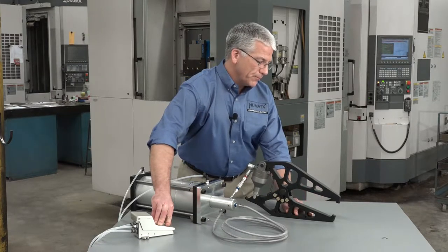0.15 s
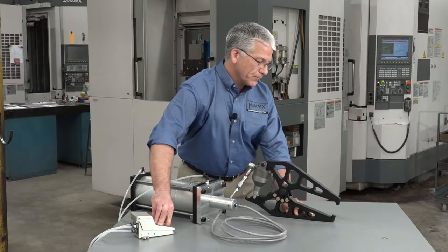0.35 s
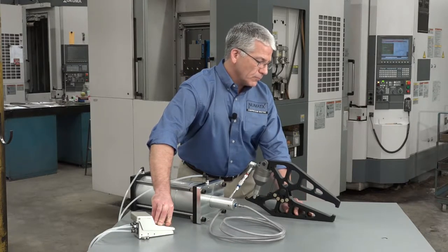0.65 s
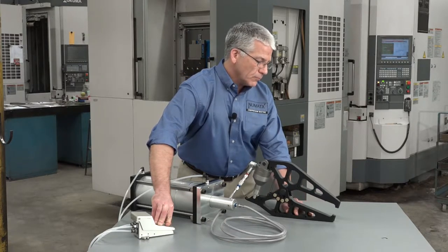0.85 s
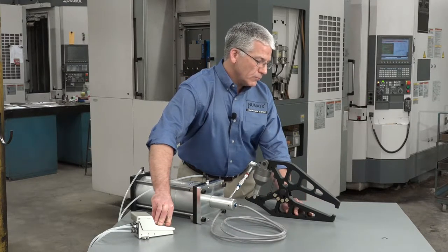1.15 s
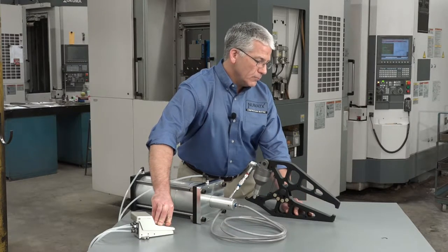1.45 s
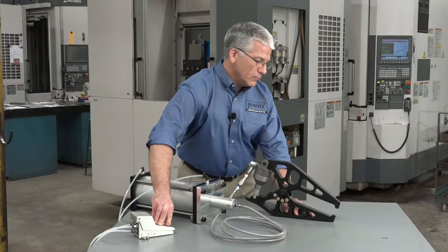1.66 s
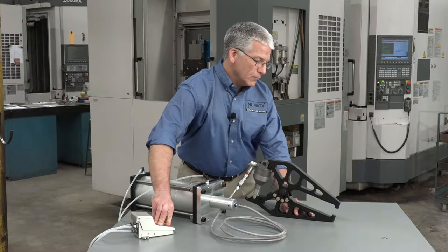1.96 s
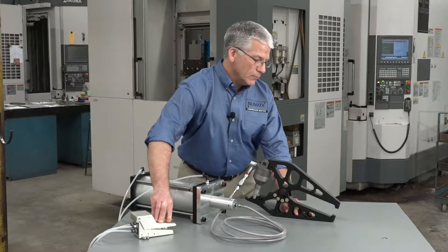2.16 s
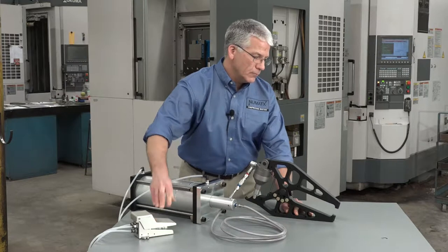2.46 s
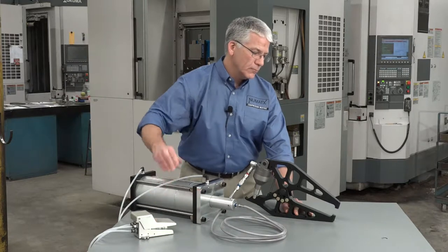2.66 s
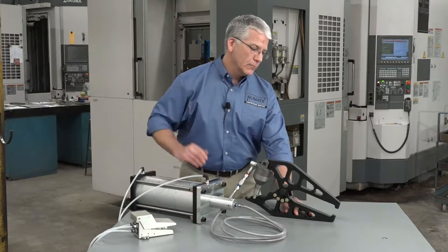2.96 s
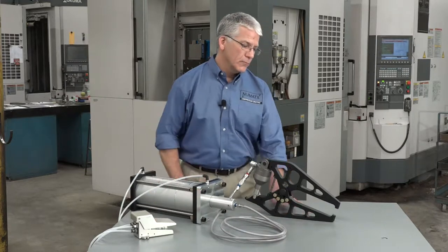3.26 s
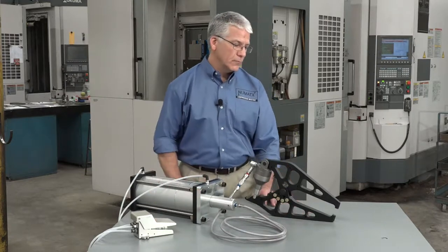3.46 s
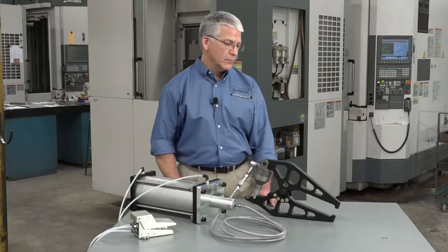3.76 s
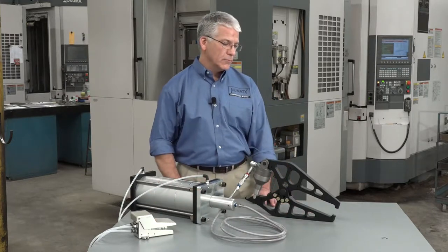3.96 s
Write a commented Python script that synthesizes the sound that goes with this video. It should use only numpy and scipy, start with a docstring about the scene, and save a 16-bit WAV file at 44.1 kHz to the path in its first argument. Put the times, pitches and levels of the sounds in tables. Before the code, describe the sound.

A loud rush of pressurised air ends in a hard knock; thin whistly hissing follows, then a bright burst of exhaust air slowly dies away.

```python
"""In a workshop, on a chest microphone: compressed air rushes through a pedal valve into a steel cylinder,
as shaped noise, until the piston knocks at its stop, a sum of dying body tones. The last air seeps in
and the cylinder whistles in many narrow bands of resonated noise. The pedal is let go and the cylinder
vents, as noise that fades and changes colour; a short bright rush joins as the venting opens, along with
a chirp of the valve. A faint bed of shop noise runs throughout."""
import sys
import numpy as np
from scipy import signal
from scipy.fft import rfft, irfft, next_fast_len
from scipy.io import wavfile
from scipy.ndimage import uniform_filter1d

SR = 44100
rng = np.random.default_rng(int(sys.argv[2]) if len(sys.argv) > 2 else 0)


def transcribe(signal):
    """Save signal, clipped to [-1, 1], as a 16-bit WAV file at the path in sys.argv[1]."""
    frames = np.atleast_2d(signal).T
    limited = np.clip(frames, -1, 1)
    pcm = np.round(limited * 32767).astype(np.int16)
    wavfile.write(sys.argv[1], SR, pcm)


N = 181115
T = np.arange(N) / SR
HZ = np.fft.rfftfreq(next_fast_len(N), 1 / SR)
KNOCK_S, WHISTLE_S = 0.7238, 2.289  # the piston meets its stop; the valve whistles as it cracks open

# faint top of the filling and venting jets: pitch_hz, width_hz (at half amplitude), level_db (relative)
AIRY_TOP = [(11500, 3000, -49), (13200, 1500, -56)]


def gain_of(db):
    """Amplitude factor for a level in dB."""
    return 10 ** (np.asarray(db) / 20)


def evened(x):
    """Scales to rms 1."""
    return x / np.sqrt(np.mean(x ** 2) + 1e-20)


def read(points, hz):
    """Reads a curve of (Hz, value) points on a logarithmic pitch axis."""
    point_hz, value = np.transpose(points)
    return np.interp(np.log(hz + 1), np.log(point_hz + 1), value)


def coloured(x, gain):
    """Filters by a gain for each frequency in HZ."""
    size = next_fast_len(N)
    return irfft(rfft(x, size) * gain, size)[:N]


def wander(top_hz):
    """Random drift, rms 1, from 24 sines spaced 1 Hz to top_hz, the slowest strongest."""
    t = np.arange(0, N / SR + 0.01, 1 / 200)  # 200 points a second: sines above 100 Hz fold down
    phases = 2 * np.pi * rng.random(24)
    rates_hz = np.geomspace(1, top_hz, len(phases))
    swings = np.sin(2 * np.pi * t[:, None] * rates_hz + phases)
    return np.interp(T, t, evened(swings @ rates_hz ** -0.5))


def resonate(x, hz, pole_width_hz):
    """A gliding resonance: shifts the curve hz down to zero, smooths twice, and shifts back."""
    turn = np.exp(2j * np.pi * np.cumsum(hz) / SR)
    r = np.exp(-np.pi * pole_width_hz / SR)
    smooth = signal.lfilter([(1 - r) ** 2], [1, -2 * r, r * r], x * turn.conj())
    return (turn * smooth).real


def jet(spectrum, passages=(), jet_db=0):
    """Turbulent noise, rms 1: a broad spectrum plus the resonances of the air passages."""
    power = gain_of(read(spectrum, HZ) + jet_db) ** 2
    for hz, width_hz, db in passages:
        power = power + (gain_of(db) / (1 + (2 * (HZ - hz) / width_hz) ** 2)) ** 2
    return evened(coloured(rng.standard_normal(N), np.sqrt(power)))


def patchy(x, db):
    """Random patches of pitch and time make the colour uneven."""
    z = signal.stft(x, nperseg=1024)[2]
    patches = uniform_filter1d(rng.standard_normal(z.shape), size=4, axis=0)  # over pitch
    patches = uniform_filter1d(patches, size=14, axis=1)  # over time
    return signal.istft(z * gain_of(db * evened(patches)), nperseg=1024)[1][:N]


def lopsided(x, skew):
    """Pressure dips run deeper than peaks rise: a share of the square adds rumble and a flickering treble."""
    # colour of the squared pressure: pitch_hz, level_db
    square_colour = [(30, -23), (110, 7), (2000, -4), (6000, 9), (9000, -23), (11500, -21), (14500, -33)]
    return x - skew * coloured(x ** 2, gain_of(read(square_colour, HZ)))


def shop():
    """The room's steady background, as shaped noise."""
    # background spectrum: pitch_hz, density_db (per Hz, relative)
    shop_spectrum = [(18, -67), (30, -34), (146, -5), (178, -13), (257, -6.5), (403, -14.5), (815, -15),
                     (881, -16), (1610, -16), (3200, -20.5), (4160, -25), (7040, -120)]
    return gain_of(-54.5) * jet(shop_spectrum)


def fill():
    """The open valve feeds the moving piston; at the stop the flow collapses and the shop rings on."""
    # jet spectrum: pitch_hz, density_db (per Hz, relative)
    fill_spectrum = [(18, -59), (30, -33), (89, -5.5), (135, 0), (199, -7.5), (524, -16), (937, -6.5),
                     (1350, -11.5), (1640, -8.5), (2140, -11.5), (3150, -1.5), (3550, -5), (5490, -5.5),
                     (6350, -17.5), (9830, -36), (12800, -60), (21600, -120)]
    # air passages: pitch_hz, width_hz (at half amplitude), level_db (relative)
    fill_passages = [(134, 54, -7), (970, 330, -14.5), (1585, 82, -5), (2224, 37, -12.5), (3160, 126, 3),
                     (3380, 27, -15), (4055, 120, -1.5), (4374, 80, 2), (4690, 110, 2), (5310, 110, 0.5),
                     (5370, 110, -6), (7380, 43, -23), (8400, 31, -14.5), (9910, 150, -56)]
    level_db, sag_db_per_s = -22.5, 4.5  # the level sags while the piston travels
    shut_s, shut_t60_s = 0.733, 0.2
    echo, echo_t60_s = gain_of(-10), 0.42  # share of the sound that rings on

    air = patchy(jet(fill_spectrum, fill_passages + AIRY_TOP, jet_db=0.5), db=1.0)
    air = air * gain_of(0.5 * wander(40))
    after = np.maximum(T - shut_s, 0)
    stop = (1 - echo) * gain_of(-60 * after / shut_t60_s) + echo * gain_of(-60 * after / echo_t60_s)
    sagging = gain_of(level_db - sag_db_per_s * np.minimum(T, shut_s))
    return sagging * stop * lopsided(air, skew=0.076)


def seep_level():
    """Gain of the seeping air: creeps in under the roar, opens after the knock, runs down in a line."""
    level_db, under_db, rise_s = -36.5, -3.5, 0.14  # under_db: extra level until the knock
    rundown_s, equal_s = 1.21, 2.54  # the line starts down; it would reach zero
    cut_s = 0.03  # the seeping dies as the valve turns over

    rise_db = under_db * (1 - np.clip((T - KNOCK_S) / rise_s, 0, 1))
    flow = np.clip((equal_s - T) / (equal_s - rundown_s), 0, 1)
    flow = flow * np.minimum(T / KNOCK_S, 1)
    cut = np.clip(1 - (T - WHISTLE_S) / cut_s, 0, 1)
    return gain_of(level_db + rise_db) * flow * cut


def seep():
    """Faint turbulence excites narrow modes of the trapped air, which rise a little as pressure settles."""
    # jet spectrum: pitch_hz, density_db (per Hz, relative)
    seep_spectrum = [(1000, -27), (3200, -20.5), (3800, -9), (5500, -6), (6300, -16), (8000, -23),
                     (9200, -37.5), (14000, -51)]
    # modes of the trapped air once the pressure has settled: pitch_hz
    mode_pitches = [1600, 2310, 2700, 3685, 3800, 4285, 4560, 4815, 4900, 5160, 5495, 5720, 5875, 6065,
                    6360, 6595, 6960, 7125, 7520, 7920, 8230, 8700, 9860]
    # the same modes: nominal width_hz, level_db at 1.25 s (for a width of 300 Hz), change_db_per_s
    mode_shapes = [(40, -18.5, 4), (35, -20.5, 6), (32, -20, 4), (56.4, -5, -2), (110, -16.5, 10.5),
                   (40, -6.5, 2.5), (100, -15.5, 5), (67.7, 0, -2), (70, -6, 1.5), (45, -3, 2.5),
                   (88.4, -4, -1), (90, -12, -15), (89, -0.5, -10), (40, -10, -17), (80, -23, -6),
                   (69.6, -17, -16), (50, -15.5, -9), (60, -16, -14), (150, -22.5, -22), (130, -20, -12),
                   (70, -34, -3), (150, -34.5, -23), (50, -38, -13)]

    end = round((WHISTLE_S + 0.1) * SR)
    tuning = 1 - 0.022 * np.exp(-np.maximum(T - 0.75, 0) / 0.33)
    air = gain_of(-12) * jet(seep_spectrum)
    for hz, (width_hz, db, slope_db) in zip(mode_pitches, mode_shapes):
        drift = tuning * (1 + 0.0008 * wander(6))
        mode = evened(resonate(rng.standard_normal(end), hz * drift[:end], 1.19 * width_hz))
        swell_db = db + slope_db * (T - 1.25) + 0.39 * wander(7.5)
        air[:end] += mode * np.sqrt(width_hz / 300) * gain_of(swell_db[:end])
    return seep_level() * lopsided(air * gain_of(0.42 * wander(40)), skew=0.087)


def knock():
    """The piston at its stop rings the cylinder body, a sum of dying tones."""
    # body tones: pitch_hz, level_db (relative), t60_s
    body = [(359, -2, 0.04), (600, -5, 0.016), (844, -0.5, 0.024), (1150, -8, 0.02), (1590, -0.5, 0.013),
            (2170, -5, 0.022), (3300, -6, 0.013), (4640, -3.5, 0.013)]
    t = np.maximum(T - KNOCK_S, 0)
    ring = sum(gain_of(db - 60 * t / t60) * np.sin(2 * np.pi * hz * t) for hz, db, t60 in body)
    ring *= 1 - np.exp(-t / 0.00038)  # softens the onset
    return gain_of(-15.5) * ring / abs(ring).max()


def vent_level():
    """Gain of the venting air: a quick opening with an overshoot, a steady fall, a small hiss that stays."""
    lead_s, open_s = 0.012, 0.028  # air escapes just before the whistle
    overshoot_db, overshoot_s = 4.5, 0.087
    level_db, fall_db_per_s, stay_db = -23, 13.5, -40

    t = np.maximum(T - WHISTLE_S + lead_s, 0)
    falling = gain_of(level_db - fall_db_per_s * t + overshoot_db * np.exp(-t / overshoot_s))
    opening = 1 - np.exp(-(t / open_s) ** 3)
    return np.sqrt(falling ** 2 + gain_of(stay_db) ** 2) * opening


def vent():
    """Turbulent air leaves through the valve; its colour slides from a roar through a middle to a hiss."""
    # jet spectra of the roar, middle and hiss: pitch_hz, density_db (per Hz, relative)
    roar_spectrum = [(18, -62), (30, -33), (132, -9), (286, -21), (330, -11.5), (453, -24), (753, -12),
                     (960, 0), (1220, -9), (1720, -3.5), (2410, -12), (3150, -3), (5110, -8.5),
                     (8300, -23.5), (9830, -38.5), (12800, -59), (21600, -120)]
    middle_spectrum = [(18, -74), (30, -42), (128, -12), (475, -20.5), (735, -10), (937, 0), (1220, -12.5),
                       (1450, -6.5), (1990, -13.5), (3220, -5), (4210, -11), (5630, -7), (6350, -17),
                       (7530, -17.5), (9830, -39.5), (12800, -69), (21600, -120)]
    hiss_spectrum = [(18, -77), (30, -52), (125, -7.5), (180, -33), (253, -9.5), (339, -22), (421, -19.5),
                     (718, -11), (937, 2.5), (1220, -11.5), (3150, -11.5), (3730, -16), (4530, -7.5),
                     (8100, -16.5), (9830, -43), (12800, -62), (21600, -120)]
    # port resonances at those stages: pitch_hz, width_hz (at half amplitude), level_db (relative)
    roar_ports = [(138, 24, -7), (1045, 110, -4.5), (1465, 21, -12), (1700, 290, -2), (2160, 19, -4),
                  (2260, 40, 0), (2608, 76, 1.5), (3160, 220, 0), (4580, 39, 0.5), (5240, 91, -3),
                  (7540, 91, -35), (7500, 42, -25), (7340, 43, -27)]
    middle_ports = [(997, 110, 0), (1470, 67, -10), (2254, 14, 0.5), (2580, 260, -4), (3270, 106, -1.5),
                    (3860, 23, -17), (4510, 93, -1.5), (5200, 49, -0.5), (5570, 77, -3), (6970, 110, -15),
                    (7450, 260, -19), (8040, 45, -15), (8600, 180, -24)]
    hiss_ports = [(953, 84, -7), (1470, 86, -6), (2500, 400, -10), (3080, 150, -7), (4580, 440, -3),
                  (4830, 30, 3), (5270, 230, -6), (5770, 99, -5), (5970, 55, -0.5), (6400, 110, -6),
                  (7110, 76, -14), (7740, 92, -14), (8250, 120, -10)]
    # further bands of the hiss: pitch_hz, width_hz (at half amplitude), level_db (relative)
    late_bands = [(9700, 500, -29.5), (12800, 600, -43), (3870, 1100, -10.5)]
    # colour stage of the vent: time_s, stage (1 roar, 0 hiss)
    stage_points = [(2.3, 0.96), (2.66, 0.87), (2.72, 0.53), (3.0, 0.5), (3.3, .43), (3.5, 0.18),
                    (3.9, 0.14)]

    stage = np.interp(T, *np.transpose(stage_points))
    roar = np.clip(2 * stage - 1, 0, 1)
    hiss = np.clip(1 - 2 * stage, 0, 1)
    air = np.sqrt(roar) * jet(roar_spectrum, roar_ports + AIRY_TOP, jet_db=-1.5)
    air += np.sqrt(abs(1 - roar - hiss)) * jet(middle_spectrum, middle_ports + AIRY_TOP, jet_db=-0.5)
    air += np.sqrt(hiss) * jet(hiss_spectrum, hiss_ports + AIRY_TOP + late_bands, jet_db=2.0)
    air = patchy(air, db=1.0) * gain_of(0.5 * wander(40))
    return vent_level() * lopsided(air, skew=0.053 + 0.042 * stage)


def whistle():
    """The valve gives one short, slightly unsteady whistle as it cracks open."""
    # the whistle: pitch_hz, level_db, t60_s
    chirp = (6050, -22, 0.07)
    hz, db, t60 = chirp
    t = np.maximum(T - WHISTLE_S, 0)
    tone = np.sin(2 * np.pi * hz * t + 2.3 * wander(240))  # phase drift in radians
    return gain_of(db - 60 * t / t60) * (1 - np.exp(-t / 0.0023)) ** 2 * tone


def burst():
    """A short bright rush of turbulent noise joins as the venting opens, along with the whistle."""
    # first rush: pitch_hz, density_db (per Hz, relative)
    burst_spectrum = [(1200, -16), (2200, -14), (2900, 6.5), (3600, -13), (5000, 1), (6200, -24),
                      (8500, -39), (12000, -49)]
    level_db, t60_s, attack_s = -22, 0.5, 0.016
    t = np.maximum(T - WHISTLE_S, 0)
    swell = (1 - np.exp(-t / attack_s)) ** 2
    return gain_of(level_db - 60 * t / t60_s) * swell * jet(burst_spectrum)


def scene():
    """The same sound on both sides, a little left; a faint independent noise of the same colour widens it."""
    near = shop() + fill() + seep() + knock() + vent() + whistle() + burst()
    z = signal.stft(near, nperseg=1024)[2]
    random_phase = np.exp(2j * np.pi * rng.random(z.shape))
    side_noise = signal.istft(z * random_phase, nperseg=1024)[1][:N]
    sides_db = [[1.05], [-1.1]]  # left, right
    # the side noise is added on the left and subtracted on the right
    return near * gain_of(sides_db) + gain_of(-19.5) * side_noise * np.array([[1], [-1]])


def record(dry):
    """The microphone drops the lowest bass; then a band limit removes the top treble."""
    highpass = signal.butter(2, 45, "highpass", fs=SR, output="sos")
    thin = signal.sosfilt(highpass, dry)
    lowpass = signal.firwin(511, 14600, window=("kaiser", 9), fs=SR)
    return signal.oaconvolve(thin, lowpass[None], "same")


dry = scene()
out = record(dry)
transcribe(out)
```